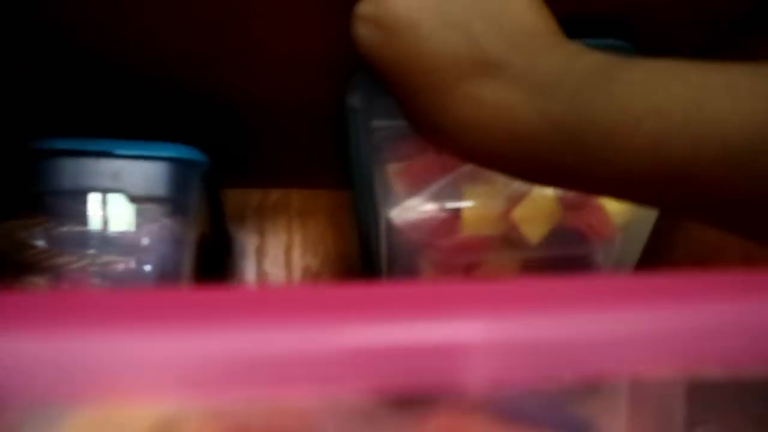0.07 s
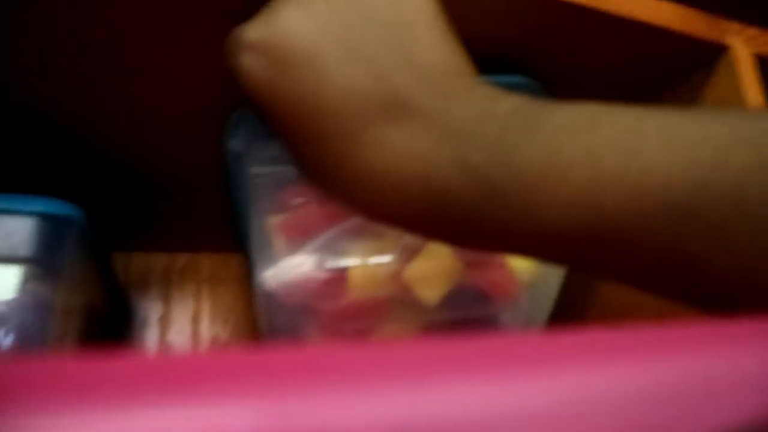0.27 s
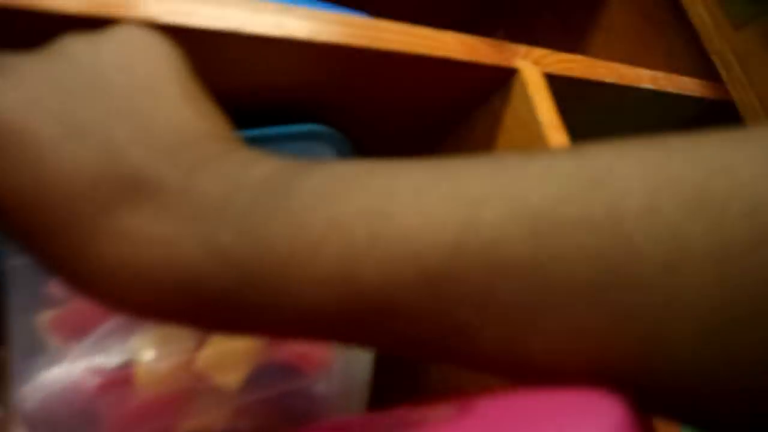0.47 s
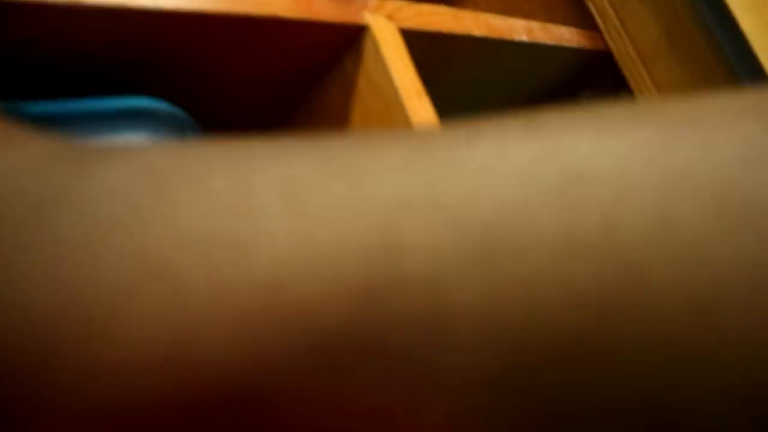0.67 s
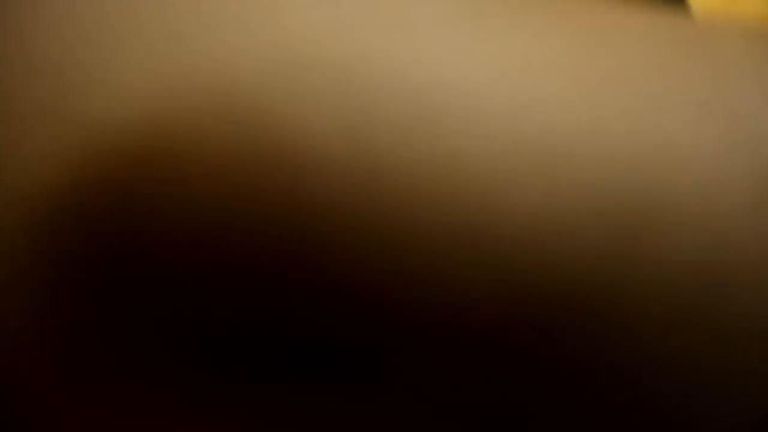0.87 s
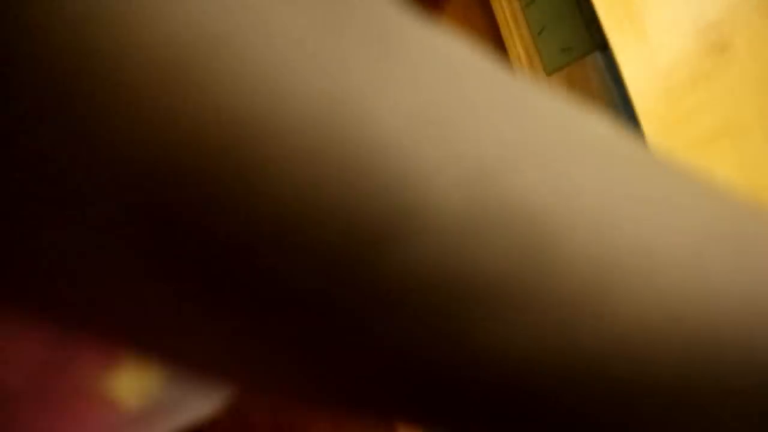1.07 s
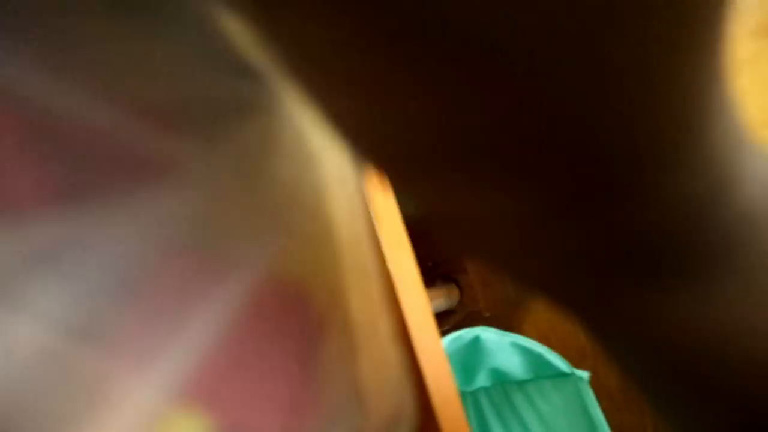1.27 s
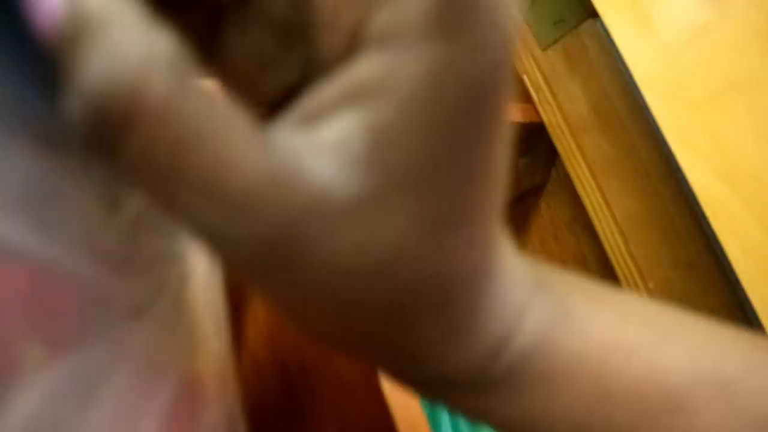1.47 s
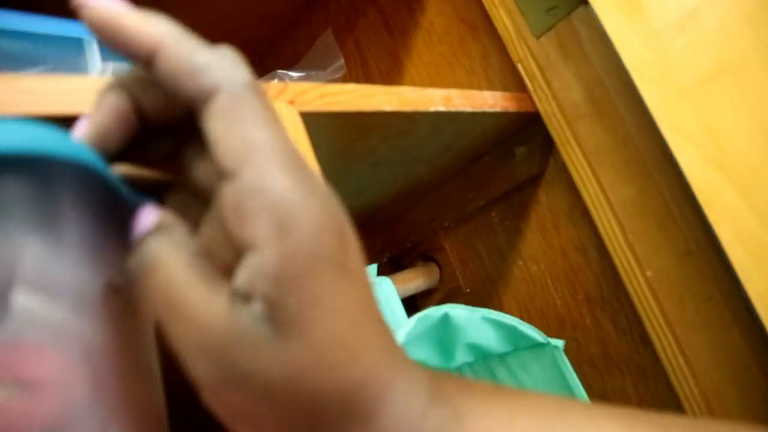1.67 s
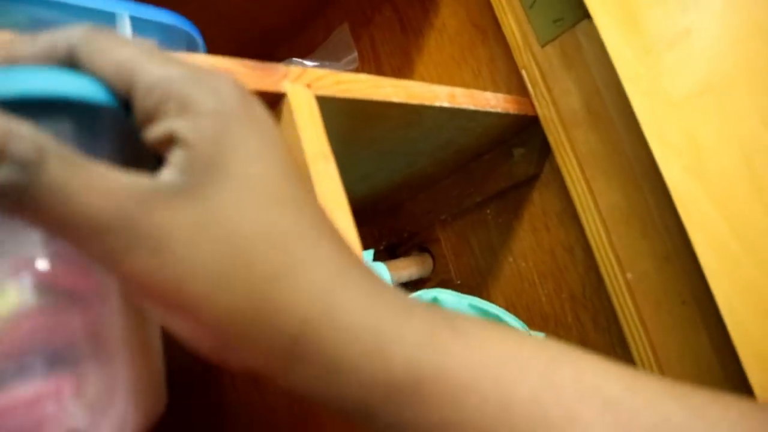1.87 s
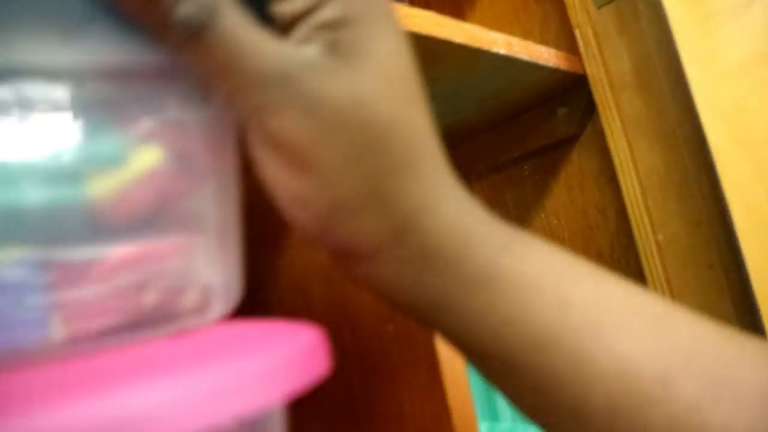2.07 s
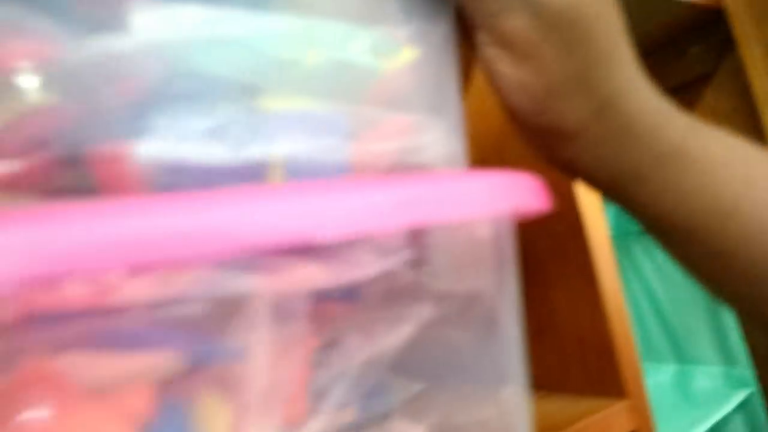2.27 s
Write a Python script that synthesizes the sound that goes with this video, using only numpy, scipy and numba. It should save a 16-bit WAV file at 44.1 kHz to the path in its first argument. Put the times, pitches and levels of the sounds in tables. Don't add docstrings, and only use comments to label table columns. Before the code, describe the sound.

Plastic storage bins move on a wooden shelf, close and slightly left, in a quiet room with a short cupboard tail. Light knocks and scuffs from 0.1 s, a sharp lid snap at 0.32, clacks from 0.4 to 0.7. A gritty, hollow scrape swells from 0.8 to 1.6, with a dull bump near 0.95. A shove knocks at 1.64, fading by 1.9; hard bangs and thumps follow from 1.97, loudest at 2.13 and 2.23.

```python
import sys
import numpy as np
from scipy import signal
from scipy.fft import rfft, irfft, next_fast_len
from scipy.io import wavfile
from scipy.ndimage import uniform_filter1d
from numba import njit

SR = 44100
rng = np.random.default_rng(int(sys.argv[2]) if len(sys.argv) > 2 else 0)


def inscribe(sig):
    pcm = np.round(np.clip(np.atleast_2d(sig).T, -1, 1) * 32767)
    wavfile.write(sys.argv[1], SR, pcm.astype(np.int16))


def voltage_ratio(level):
    return 10 ** (np.asarray(level, float) / 20)


N = 102267
T = np.arange(N) / SR
M = next_fast_len(N + 4096)
F = np.arange(M // 2 + 1) * SR / M + 1


def unit(x):
    return x / np.sqrt(np.mean(x ** 2))


def gains(points):
    p = np.array(points, float)
    return voltage_ratio(np.interp(np.log(F), np.log(p[:, 0] + 1), p[:, 1]))


def shape(x, points):
    return irfft(rfft(x, M) * gains(points), M)[:N]


@njit
def svf(x, g, q):
    y, b, l, k = np.empty(len(x)), 0., 0., 1 / q
    for i in range(len(x)):
        v = (b + g[i] * (x[i] - l)) / (1 + g[i] * (g[i] + k))
        b, l, y[i] = 2 * v - b, l + 2 * g[i] * v, k * v
    return y


def band(x, hz, q):
    centre_hz = np.clip(hz + 0 * T, 50, 15000)
    return svf(x, np.tan(np.pi * centre_hz / SR), 1. * q)


def walk(rate_hz):
    k = int(SR / rate_hz)
    held = np.repeat(rng.standard_normal(N // k + 1), k)
    return 0.91 * uniform_filter1d(uniform_filter1d(held, k), k)[:N]


def grit():
    specks_per_s, spread_db, largest = 5500, 2.5, 6.1
    hit, sign, size = rng.random((N, 3)).T
    size = np.minimum(-np.log(size + 1e-9), largest)
    return unit((hit < specks_per_s / SR) * np.sign(sign - .5) * voltage_ratio(spread_db * size))


def crack(fade_s):
    return rng.standard_normal(1500) * np.exp(-T[:1500] / fade_s)


def ring(modes, length_s=0.5, swell_cycles=.01):
    t = T[:int(length_s * SR)]
    out = np.zeros(len(t))
    for k, (hz, db, t60) in enumerate(modes):
        swell = 1 - np.exp(-t * hz / swell_cycles)
        fade = np.exp(-np.log(1000) * t / t60)
        out += (-1) ** (k // 4) * voltage_ratio(db) * np.sin(2 * np.pi * hz * t) * fade * swell
    return out


def add(out, start_s, x):
    i = int(start_s * SR)
    out[i:i + len(x)] += x[:len(out) - i]


def quiet():
    # pitch_hz [Hz], level_db [dB per Hz]
    room_tone = [(18, -49), (30, 7.5), (145, -5.5), (212, -9), (376, -4.5), (1080, -14.5), (1300, -14),
                 (9000, -39), (11700, -62), (19800, -120)]
    colour = list(room_tone)[:-1] + [(16000, -42)]
    hum = unit(shape(rng.standard_normal(N), colour))
    return hum * voltage_ratio(-41 + 0.36 * walk(7.9))


def sings():
    # start_s [s], length_s [s], pitch_hz [Hz], level_db [dB]
    notes_sung = [(0.02, 0.075, 1385, -49), (0.662, 0.18, 730, -39), (0.831, 0.082, 672, -32.5),
                  (0.905, 0.091, 718, -34.5), (1.015, 0.12, 605, -36.5), (1.2, 0.058, 2000, -34.5),
                  (1.256, 0.086, 788, -35), (1.43, 0.097, 1057, -28.5), (0.776, 0.085, 1244, -36),
                  (1.334, 0.054, 1870, -34.5), (0.975, 0.072, 2360, -31.5), (1.07, 0.057, 1244, -35),
                  (1.174, 0.16, 1205, -30.5), (1.159, 0.12, 2690, -32.5), (1.295, 0.09, 1640, -26),
                  (1.379, 0.18, 1498, -29), (1.469, 0.111, 810, -30), (1.479, 0.093, 2130, -32.5),
                  (1.603, 0.11, 1330, -40), (1.742, 0.098, 917, -36)]
    flutter_db, flutter_hz, fade_s = 2, 69.8, 0.022
    out, g = np.zeros(N), grit()
    for start_s, length_s, hz, db in notes_sung:
        env = np.clip(np.minimum(T - start_s, start_s + length_s - T) / fade_s + .5, 0, 1)
        note = band(g, hz * (1 + 0.03 * walk(15.22)), 18.5)
        out += voltage_ratio(db + flutter_db * walk(flutter_hz)) * env * unit(band(note, hz, 2.2))
    return out


def scuffs():
    # start_s [s], length_s [s], level_db [dB], brightness [dB per octave]
    rubs = [(0.191, 0.075, -38.5, -1), (0.261, 0.021, -36.5, -1.5), (0.355, 0.093, -40, 2.5),
            (0.43, 0.096, -49, 4), (1.636, 0.036, -25, 1.5), (1.826, 0.072, -47, 4),
            (1.95, 0.042, -30.5, -2), (1.983, 0.026, -45, 4), (2.069, 0.011, -28.5, -1.5),
            (2.088, 0.049, -29, -0.5), (2.159, 0.011, -25.5, 0.5), (2.178, 0.021, -25, 0),
            (2.226, 0.0037, -26.5, 1.5), (2.245, 0.027, -27, 1), (2.311, .04, -31, -0.5)]
    # pitch_hz [Hz], level_db [dB per Hz]
    rub_tone = [(100, 1), (350, 4), (800, 0.5), (1500, -6), (3000, -8), (4600, -14.5), (8000, -19),
                (15000, -29.5)]
    attack_s, release_s, judder_db, judder_hz = 0.0042, 0.021, 3, 44.42
    out, g = np.zeros(N), shape(grit(), rub_tone) * voltage_ratio(judder_db * walk(judder_hz))
    for start_s, length_s, db, tilt in rubs:
        attack = np.clip((T - start_s) / attack_s, 0, 1)
        release = np.exp(-np.clip(T - start_s - length_s, 0, None) / release_s)
        tilted = shape(g, [(100, -3.3 * tilt), (1000, 0), (10000, 6.4 * tilt)])
        out += voltage_ratio(db) * attack * release * unit(tilted)
    return out


def snap():
    # start_s [s], level_db [dB]
    rim_ticks = [
        (0.3218, -28),
        (0.3246, -10.5),
        (0.3265, -27),
        (0.3259, -16),
        (0.3278, -19),
    ]
    # pitch_hz [Hz], level_db [dB], t60_s [s]
    lid = [(536, -10.5, 0.032), (900, -16, 0.086), (1400, -2.5, 0.02), (2330, 0, 0.013), (3280, -6, 0.012),
           (4270, -5.5, 0.012), (5670, -8, 0.014), (9450, 0, .01)]
    crack_db, crack_s = 1.5, 0.0014
    out = np.zeros(N)
    for (start_s, db), scatter_db in zip(rim_ticks, rng.standard_normal((len(rim_ticks), len(lid)))):
        modes = [(hz, d + 1.0 * a, t60) for (hz, d, t60), a in zip(lid, scatter_db)]
        add(out, start_s, voltage_ratio(db) * 0.58 * ring(modes, .1))
        add(out, start_s, voltage_ratio(db + crack_db) * band(crack(crack_s), 4200, 0.091))
    return out


def clacks():
    # start_s [s], pitch_hz [Hz], level_db [dB]
    panels = [(0.0868, 1400, -36), (0.211, 1300, -32), (.2135, 2570, -43), (.235, 610, -27.5),
              (.256, 760, -37), (.258, 3740, -42), (.272, 2550, -32), (0.312, 1460, -45),
              (0.4025, 1374, -22.5), (.404, 563, -27.5), (.429, 394, -26), (0.441, 1480, -25),
              (.449, 2980, -35), (0.4603, 2980, -24), (0.466, 1490, -25), (.471, 430, -29.5),
              (0.481, 830, -30), (.506, 1460, -33), (.517, 490, -28), (.612, 350, -35), (0.637, 966, -29),
              (.645, 390, -29.5), (.667, 770, -39), (.688, 690, -29), (.705, 804, -24), (.7045, 303, -20),
              (.795, 765, -25), (.803, 695, -20.5), (.829, 650, -17), (1.643, 602, -18.5), (1.689, 98, -27),
              (1.648, 1090, -16), (1.661, 1315, -14), (1.669, 490, -23), (1.678, 2540, -16),
              (1.706, 1350, -18), (1.722, 1370, -26), (1.733, 730, -21), (1.782, 1250, -21.5),
              (1.814, 730, -26.5), (1.845, 760, -26.5), (1.872, 507, -33.5), (2.079, 815, -20),
              (2.086, 1450, -14), (2.103, 4320, -25.5), (2.105, 1300, -26), (2.126, 5040, -20.5),
              (2.158, 1270, -20), (2.164, 965, -19), (2.1726, 2120, -19), (2.177, 3800, -16),
              (2.185, 1000, -17), (2.192, 2080, -30), (2.200, 3170, -21), (2.229, 2150, -14.5),
              (2.229, 3760, -13), (2.231, 4700, -12.5), (2.255, 3960, -14.5), (2.268, 3030, -14),
              (2.271, 4570, -15)]
    pair_ratio, pair_db, swell_s = 1.116, -8.5, 0.00088
    out = np.zeros(N)
    for start_s, hz, db in panels:
        t60 = 0.012 + 17.7 / hz
        x = ring([(hz, db, t60), (hz * pair_ratio, db + pair_db, t60)], .16)
        add(out, start_s, x * (1 - np.exp(-T[:len(x)] / swell_s)))
    return out


def slide():
    # time_s [s], level_db [dB], scrape_hz [Hz]
    drag = [
        (.615, -47.5, 804),
        (.77, -36, 755),
        (.84, -27.5, 900),
        (1.02, -23, 1290),
        (1.14, -26, 1210),
        (1.35, -22.5, 1480),
        (1.54, -25, 1300),
        (1.625, -26, 1300),
    ]
    # time_s [s], level_db [dB], scrape_hz [Hz]
    shove = [
        (1.63, -26, 1020),
        (1.65, -24, 1230),
        (1.72, -25.5, 1180),
        (1.76, -34.5, 940),
        (1.815, -32, 775),
        (1.93, -59, 790),
    ]
    # pitch_hz [Hz], width_hz [Hz], level_db [dB]
    dragged_walls = [(198, 210, -15.5), (322, 59, -0.5), (715, 70, 0.5), (1035, 200, -4.5), (1300, 150, 0),
                     (1480, 92, -4.5), (1786, 140, -3.5), (2013, 43, -9.5), (2487, 200, -2.5),
                     (2950, 340, -6), (3570, 760, -8.5), (5600, 1900, -47)]
    wander_db, drift, scrape_db = 1, 0.068, -3.5
    judder_db, judder_hz, top_judder_db = 2.28, 69.94, 4
    time_s, level_db, scrape_hz = np.array(list(drag) + list(shove), float).T
    g = grit()
    lift_db = np.interp(T, (1.16, 2.04), [0, -26]) * (T < shove[0][0])
    walls = np.zeros(N)
    for k, (hz, width_hz, db) in enumerate(dragged_walls):
        level = voltage_ratio(db + wander_db * walk(14.57) + (hz < 500) * lift_db)
        wall = band(np.roll(g, 7001 * k), hz * (1 + drift * walk(4.84)), hz / width_hz)
        walls += level * wall / np.sqrt(width_hz)
    centre = np.interp(T, time_s, scrape_hz)
    scrape = band(band(g, centre, 0.95), centre, 0.53)
    mix = unit(walls) + voltage_ratio(scrape_db) * unit(scrape)
    mix = mix + (voltage_ratio(top_judder_db * walk(8.2)) - 1) * band(mix, 11500, 1.6)
    effort_db = np.interp(T, time_s, level_db, left=-90, right=-90)
    return unit(mix) * voltage_ratio(-2 + judder_db * walk(judder_hz) + effort_db)


def knocks():
    # start_s [s], wall_db [dB], contact_ms [ms], board_hz [Hz], board_db [dB]
    hits = [(0.0881, -27, 0.21, 152, -32.5), (0.1951, -24, 0.36, 167, -32), (0.213, -25.5, 0.37, 220, -32),
            (0.27, -29, 0.67, 111, -30.5), (.402, -34, 0.23, 230, -32), (0.445, -26.5, 0.75, 155, -24.5),
            (.468, -23.5, 0.63, 141, -53), (0.487, -24, 0.37, 141.5, -25.5), (0.52, -18.5, 1.7, 147, -33),
            (0.6297, -21.5, 0.24, 150, -38), (.690, -22, 0.33, 115, -63), (0.7013, -14.5, 0.26, 112, -33),
            (0.954, -4, 3.3, 184, -20.5), (1.057, -46, 1.1, 314, -20.5), (1.401, -24.5, 0.88, 144, -28.5),
            (1.636, -10, 0.34, 102, -23.5), (1.806, -11, 0.32, 100, -16.5), (1.83, -11, 0.73, 95, -30.5),
            (1.967, -6, 0.75, 100.8, -12.5), (2.0382, -12.5, 0.49, 97, -24.5), (2.09, -10.5, 0.21, 98, -30),
            (2.126, 0.5, 0.52, 93, -17.5), (2.158, -8, 0.32, 97, -48)]
    # start_s [s], wall_db [dB], contact_ms [ms], board_hz [Hz], board_db [dB]
    last_hits = [
        (1.771, -25, 0.68, 95.3, -25),
        (2.188, -4.5, 0.26, 98, -48),
        (2.2307, 1, 0.98, 99.4, -10.5),
        (2.2339, -2.5, 1.53, 99, -27),
        (2.262, -15, 1.8, 100.6, -15),
        (2.286, -9.5, 1.26, 101, -12.5),
    ]
    # pitch_hz [Hz], level_db [dB], t60_s [s]
    struck_walls = [(277, -11, 0.1), (336, -1, 0.062), (390, -8.5, 0.03), (571, -1, 0.023),
                    (652, -16.5, 0.021), (913, -2, 0.013), (1300, 0, 0.011), (2090, -7.5, .02),
                    (4700, -12, 0.029)]
    # pitch_ratio, level_db [dB], share of its ring time
    board_sides = [(.68, -10, 0.39), (1.55, -9, 0.57)]
    detune, scatter_db, wall_swell_cycles = .02, 2.0, 0.4
    board_cycles, board_swell_s = 21.9, 0.0017
    crack_db, crack_s = -5, .003
    board_notes = [(1, 0.011, 0.87)] + list(board_sides)
    out, rows = np.zeros(N), list(hits) + list(last_hits)
    chance = rng.standard_normal((len(rows), 2 * len(struck_walls)))
    for (start_s, db, contact_ms, board_hz, board_db), c in zip(rows, chance):
        push = np.sin(np.pi * np.clip(T[:200] * 1000 / max(contact_ms, .1), 0, 1))
        modes = [(hz * (1 + detune * a), d + scatter_db * b, t60)
                 for (hz, d, t60), a, b in zip(struck_walls, c[::2], c[1::2])]
        walls = 0.44 * ring(modes, .2, wall_swell_cycles)
        add(walls, 0, voltage_ratio(crack_db) * crack(crack_s))
        board = ring([(board_hz * ratio, board_db + d, share * board_cycles / board_hz)
                      for ratio, d, share in board_notes], .3)
        add(out, start_s, -voltage_ratio(db) * signal.fftconvolve(walls, push / push.sum()))
        add(out, start_s, -board * (1 - np.exp(-T[:len(board)] / board_swell_s)))
    return out


def ports(near):
    # pitch_hz [Hz], lead [radians]
    lead = [(300, .1), (2000, 1.1), (4500, 1.7), (7500, 2.1), (10000, 2.7), (15000, 2.8)]
    # pitch_hz [Hz], level_db [dB]
    balance = [(380, 0), (700, 1.5), (1500, 2.8), (4400, 1.5), (8000, 0)]
    turn = np.exp(.5j * np.interp(F, *np.array(lead).T))
    left = turn * np.sqrt(gains(balance))
    return irfft(rfft(near, M) * np.array([left, 1 / left]), M)[:, :N]


def cupboard(near):
    t60_s, level_db, low_cut_hz = .07, -6, 1800
    t = T[:int(.3 * SR)]
    tail = rng.standard_normal((2, len(t))) * np.exp(-np.log(1000) * t / t60_s) * (t > .002)
    tail = tail / np.sqrt((tail ** 2).sum(1, keepdims=True))
    tail = signal.sosfilt(signal.butter(2, low_cut_hz, "high", fs=SR, output="sos"), tail)
    dull = band(near, 3500, .8)
    return voltage_ratio(level_db) * signal.fftconvolve(dull[None], tail, axes=1)[:, :N]


def scene():
    near = quiet() + sings() + scuffs() + snap() + clacks() + slide() + knocks()
    return ports(near) + cupboard(near)


def band_limit(x):
    return signal.sosfilt(signal.butter(12, 15980, fs=SR, output="sos"), x)


def record(dry):
    # pitch_hz [Hz], level_db [dB]
    response = [(20, -32), (60, -8), (120, 1), (5000, 1.5), (9000, -1.5), (15000, 0), (16000, -12),
                (16400, -60)]
    headroom = 1.43
    heard = np.array([shape(x, response) for x in dry])
    return band_limit(headroom * np.tanh(heard / headroom))


dry = scene()
out = record(dry)
inscribe(out)
```